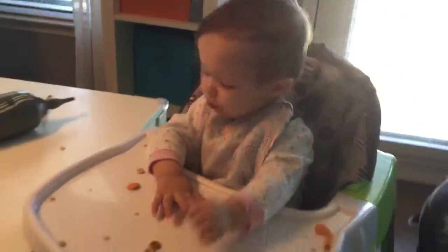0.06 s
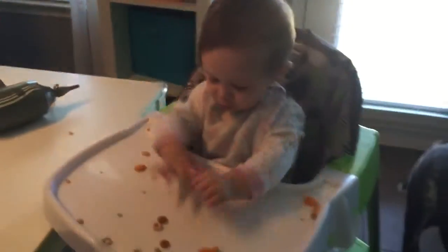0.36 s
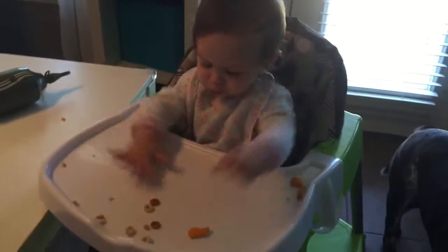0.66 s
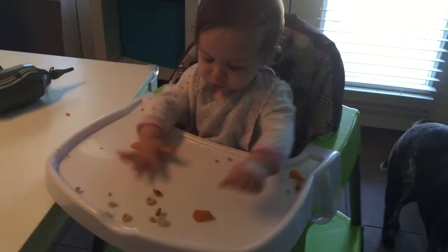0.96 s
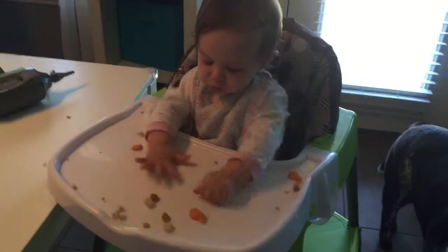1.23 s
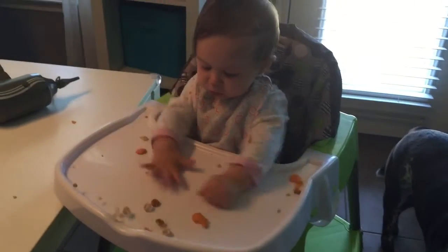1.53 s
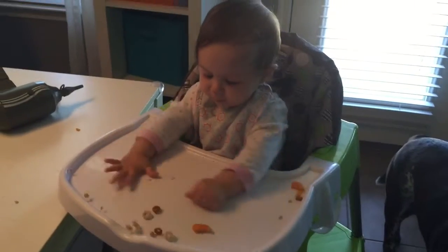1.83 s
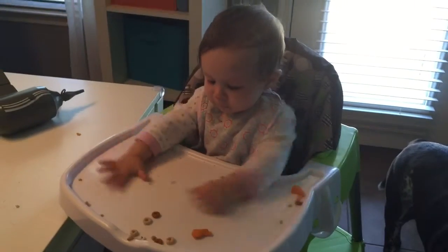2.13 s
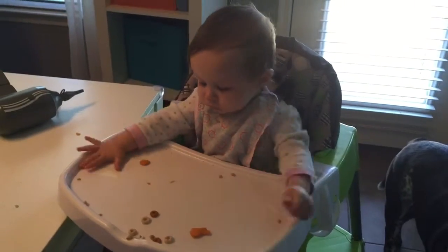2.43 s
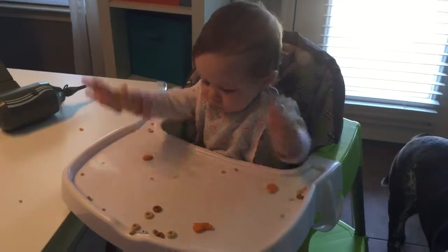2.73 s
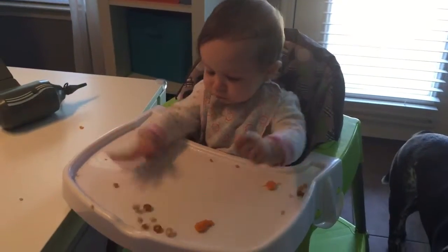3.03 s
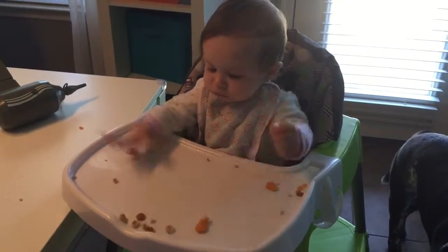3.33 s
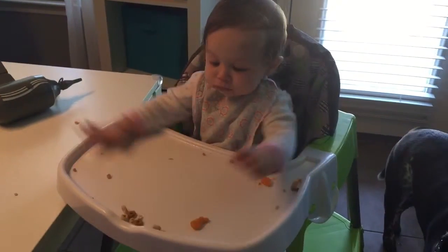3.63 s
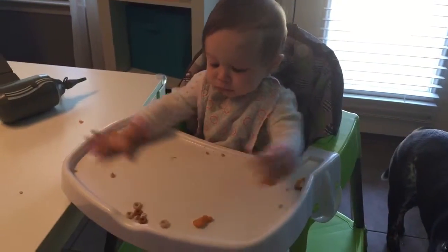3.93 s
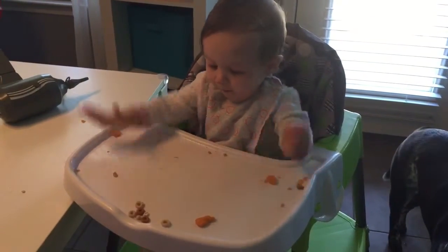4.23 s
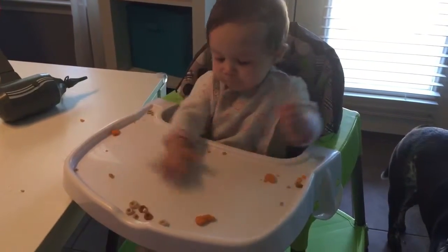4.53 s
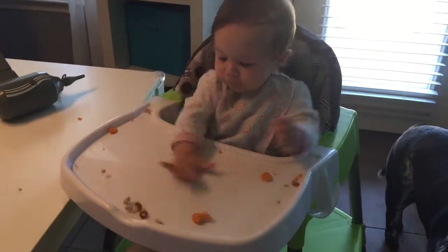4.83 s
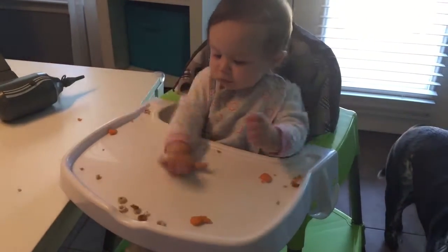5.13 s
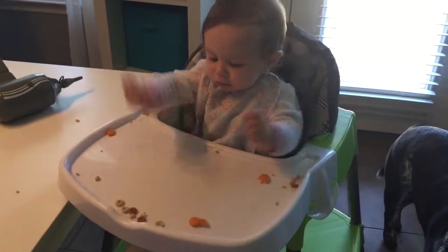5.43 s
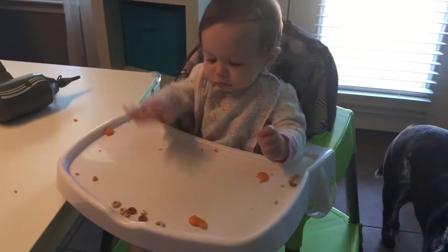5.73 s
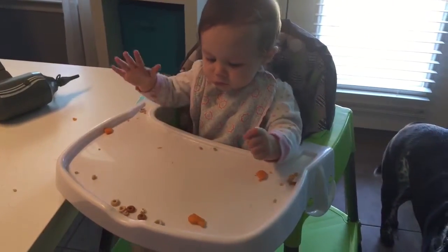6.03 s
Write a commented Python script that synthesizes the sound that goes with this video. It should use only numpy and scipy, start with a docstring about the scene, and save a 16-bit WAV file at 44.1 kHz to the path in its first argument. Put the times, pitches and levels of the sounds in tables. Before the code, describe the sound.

A sleeve brushes softly over plastic, then a baby slaps a high chair tray with both hands, about three times a second and unevenly. Each hit is a hollow knock, many with a sharp smack of skin, some doubled. Bits of cereal hop and the tray rattles lightly between hits, with brief hand slides. It is heard close by in a quiet furnished room with a faint low rumble.

```python
"""A sleeve brushes plastic over faint house rumble; then a baby slaps a hollow high chair tray with
both hands, close by, in a quiet furnished room. Each blow flexes the tray and rings its modes; a flat
palm adds a sharp smack of skin. Bits of cereal hop and land, the tray rattles on its latches, and
hands and sleeves slide over it between the slaps."""
import sys
import numpy as np
from scipy import signal
from scipy.fft import rfft, irfft
from scipy.io import wavfile

SR = 44100
rng = np.random.default_rng(int(sys.argv[2]) if len(sys.argv) > 2 else 0)


def wav_record(signal):
    """Record a signal, one row per channel, as 16-bit PCM in the file named by sys.argv[1]."""
    frames = np.transpose(np.atleast_2d(signal))
    bounded = np.clip(frames, -1, 1)
    # unit amplitude maps onto the largest positive 16-bit level
    quanta = np.round(bounded * 32767).astype(np.int16)
    wavfile.write(sys.argv[1], SR, quanta)


N = 267362
RING_TIME_S = np.arange(SR // 5) / SR
FIRM_DB = -36.5  # force of an ordinary slap; levels in the tables are relative

# House rumble and hiss: (frequency [Hz], spectral density [dB])
HOUSE_SPECTRUM = [(20, -23), (45, -19), (62, 7.5), (80, -3.5), (125, 4.5), (180, -7), (300, -16),
                  (500, -27.5), (1200, -27), (8000, -38.5), (15000, -43)]
# Hand or sleeve strokes: (time [s], length [s], level [dB], swell [0 starts at once, 2 peaks midway])
BRUSH_STROKES = [(0.097, 0.17, -74.5, 0.53), (0.378, 0.04, -58.5, 0.25), (2.198, 0.034, -58.5, 0.56),
                 (2.412, 0.042, -52, 0.24), (2.867, 0.14, -62, 0.24), (3.919, 0.17, -59.5, 0.28),
                 (4.365, 0.014, -49, .1), (4.463, 0.038, -44.5, 1.2), (4.71, 0.027, -61, .2),
                 (5.782, 0.04, -58.5, .3)]
# Sliding cloth: (frequency [Hz], gain [dB])
CLOTH_SPECTRUM = [(400, 0.5), (2000, -9.5), (4500, -0.5), (7000, 4.5), (10000, 6.5), (15500, -7)]
# Damp fingertip drags: (time [s], length [s], level [dB], band centre [Hz])
FINGER_DRAGS = [(0.375, 0.027, -46.5, 1520), (2.246, 0.027, -41, 1750), (2.558, 0.18, -63.5, 1820),
                (2.709, .03, -53, 1610), (3.239, .022, -38, 2330), (4.143, 0.022, -52, 890),
                (5.453, .025, -61.5, 880)]
# Hand strikes: (time [s], force [dB], arm weight [dB], skin smack [dB], depth [dB], hollow resonance [Hz])
SLAPS = [(0.388, -45, -39, -57, 4.5, 950), (0.652, -31.5, -35.5, -50, -3, 595),
         (0.6802, -31, -24.5, -25.5, -7.5, 580), (0.932, -27, -28, -46, 3, 1680),
         (0.9621, -36.5, -56, -27, 6, 510), (1.2031, -28, -28.5, -49, 0.5, 910),
         (1.2693, -31.5, -25, -24, -2.5, 635), (1.5422, -28.5, -37, -64, -3, 1350),
         (1.561, -43, -31, -38, 2.5, 1400), (1.873, -32.5, -43, -49, -2.5, 1304),
         (1.8893, -37, -31, -35.5, 4.5, 1460), (2.252, -41, -37.5, -58, 0, 930),
         (2.2606, -46.5, -72, -56.5, -4.5, 1390), (2.948, -36, -40, -37.5, -5.5, 1360),
         (2.958, -27, -19, -22, 0.5, 1250), (3.2516, -32.5, -37.5, -35.5, -5, 990),
         (3.275, -35, -28.5, -33.5, 0, 920), (3.5354, -31, -29, -46, 3, 740),
         (3.5691, -29.5, -23, -28, -3.5, 526), (3.875, -41, -31.5, -58, 2.5, 820),
         (4.491, -29, -18.5, -28, 1.5, 720), (4.8688, -31, -18, -24.5, 1.5, 1310),
         (5.2299, -34.5, -21.5, -32.5, 2.5, 940), (5.5991, -33, -22, -31, -2.5, 584)]
# Lower edges of the tray's bands: (body [Hz], knock [Hz], clack [Hz])
BAND_EDGES_HZ = [184, 610, 1188]
# Distinct tray modes: (frequency [Hz], level [dB], t60 [s])
TRAY_MODES = [(225, -2.5, 0.15), (257.5, 0, 0.19), (312.6, 4, 0.15), (396.5, -7, 0.22), (490, -9.5, 0.087),
              (590, -6.5, 0.062), (656, -11, 0.062), (896, 5, 0.04), (1025, -4.5, 0.1), (1112, -6, 0.15),
              (1358, 0.5, 0.068), (1755, -10.5, 0.065), (2010, 7.5, 0.018), (2240, 9, 0.014),
              (2430, 15, 0.012)]
# The tray's dense, quickly damped modes: (frequency [Hz], gain [dB])
DENSE_SPECTRUM = [(130, -3), (400, 6), (1000, -0.5), (2000, 4.5), (2600, -1.5), (3400, -5.5), (4600, -15),
                  (8000, -22.5), (15000, -35)]
# Tray on its arms, one hand-damped mode and a beating pair: (frequency [Hz], level [dB], t60 [s])
FLEX_MODES = [(152.5, -4.5, 0.055), (118.1, -12.5, 0.25), (138.6, -7, 0.17)]
# Fingers, then palm, before scaling by hand speed: (lead [s], decay time [s], level [dB])
SKIN_CONTACTS = [(0.0046, 0.0017, -8.5), (0.0023, 0.0012, -0.5)]
# Skin on plastic: (frequency [Hz], gain [dB])
SKIN_SPECTRUM = [(300, 9), (1200, 5.5), (3000, -2), (4700, -7), (6500, -0.5), (9500, -8), (12000, -4.5),
                 (15500, -11.5)]
# Cereal shakes loose, then gathers at the rim: (time [s], landing gain [dB])
CEREAL_LOOSENESS = [(0.6, -27), (1.1, -7), (3.5, 3.5), (4.5, -18), (5.6, -8)]
# Small hard contact: (frequency [Hz], gain [dB])
CLICK_SPECTRUM = [(1000, -3), (3000, 4.5), (4600, -1), (6200, 5.5), (9500, -1), (12000, -1.5), (15500, -5)]
# Crumb, fingertip and latch taps: (time [s], click [dB], tray ring [dB])
LOUD_TAPS = [(0.6164, -45.5, -52.5), (1.026, -40, -44), (1.0309, -38.5, -30.5), (1.0719, -35, -44),
             (1.1141, -47, -39.5), (1.1764, -43, -43), (1.224, -33.5, -46), (1.2885, -37, -47),
             (1.301, -39, -38.5), (1.35, -36, -62), (1.6004, -30.5, -34), (1.6082, -39, -53),
             (1.6639, -37, -41.5), (1.706, -48, -50), (1.8, -47.5, -52.5), (1.8467, -54, -56),
             (1.9024, -34, -30), (1.9263, -36, -36.5), (1.9428, -41, -32.5), (2.0394, -43, -63),
             (2.073, -50, -70), (2.4201, -46, -57), (3.045, -58, -41), (3.0638, -48, -33.5),
             (3.0827, -41, -40.5), (3.1133, -41.5, -38.5), (3.152, -37.5, -42.5), (3.369, -40.5, -51),
             (3.3936, -45, -33), (3.482, -47.5, -40), (3.551, -36, -35), (3.657, -46, -30),
             (3.6807, -49, -37.5), (3.7355, -47, -54), (3.8402, -48.5, -52), (3.9095, -41, -41.5),
             (3.931, -43, -41.5), (4.0015, -42.5, -44.5), (4.083, -51, -57), (4.243, -49, -51),
             (4.3645, -53, -79), (4.548, -49, -42), (4.5673, -45, -60), (4.598, -44.5, -50.5),
             (4.9568, -36, -30.5), (5.2837, -44.5, -37), (5.317, -47.5, -38), (5.367, -45.5, -55.5),
             (5.7205, -45.5, -51.5)]
# Room decay: (frequency [Hz], t60 [s])
ROOM_DECAY = [(100, 0.38), (250, 0.38), (600, 0.53), (1500, 0.53), (4000, 0.5), (12000, 0.67)]
# Room tail: (frequency [Hz], gain [dB])
ROOM_SPECTRUM = [(60, -19.5), (150, -6.5), (300, -4.5), (1000, -8), (2500, -8), (4200, -4.5), (6500, -7.5),
                 (14000, -12)]


def amp(db):
    """Decibels to gain."""
    return 10 ** (np.asarray(db) / 20)


def lookup(points, hz):
    """Table value on a log-frequency axis."""
    table_hz, value = np.transpose(points)
    return np.interp(np.log(hz + 1), np.log(table_hz), value)


def unit_rms(x, span_s):
    """Scales x to rms 1 over its first span_s."""
    return x / np.sqrt(np.mean(x[:int(span_s * SR)] ** 2) + 1e-20)


def add(mix, at_s, sound):
    """Mixes a sound in, in place."""
    part = mix[max(round(at_s * SR), 0):][:len(sound)]
    part += sound[:len(part)]


def colour(x, spectrum, size=4096):
    """Minimum-phase filter; attacks stay sharp."""
    log_gain = np.log(amp(lookup(spectrum, abs(np.fft.fftfreq(size, 1 / SR)))))
    impulse = np.fft.ifft(np.exp(np.conj(signal.hilbert(log_gain)))).real
    return signal.oaconvolve(x, impulse[:size // 2])[:len(x)]


def band(x, hz, kind):
    """Butterworth filter."""
    return signal.sosfilt(signal.butter(3, hz, kind, fs=SR, output="sos"), x)


def house(rms_db=-54.5):
    """Steady low rumble, faint hiss."""
    spectrum = rfft(rng.standard_normal(N)) * amp(lookup(HOUSE_SPECTRUM, np.fft.rfftfreq(N, 1 / SR)))
    return amp(rms_db) * unit_rms(irfft(spectrum, N), N / SR)


def friction(length_s, catch_db=4, catches_per_s=250, swell=0.84):
    """Skin or cloth catches and lets go: uneven noise that swells and fades."""
    progress = np.linspace(0, 1, int(length_s * SR))
    hiss, catches = rng.standard_normal((2, len(progress)))
    grip_db = catch_db * np.interp(progress * length_s * catches_per_s, np.arange(len(progress)), catches)
    return hiss * amp(grip_db) * progress ** swell * (1 - progress) ** 2


def brushes():
    """Hands and sleeves slide over the tray with a light hiss."""
    out = np.zeros(N)
    for at_s, length_s, db, swell in BRUSH_STROKES:
        stroke = colour(friction(length_s, swell=swell), CLOTH_SPECTRUM)
        add(out, at_s, amp(db) * unit_rms(stroke, length_s))
    return out


def rubs(log_half_width=0.53):
    """A damp fingertip sticks and slips, sounding one broad band of the tray."""
    out = np.zeros(N)
    for at_s, length_s, db, hz in FINGER_DRAGS:
        edges_hz = hz * np.exp([-log_half_width, log_half_width])
        slips = band(friction(length_s, catch_db=8.5), edges_hz, "band")
        add(out, at_s, amp(db) * unit_rms(slips, length_s))
    return out


def tray_ring(t=RING_TIME_S, spot_db=4, detune=0.017, fast_t60_s=0.022, slow_t60_s=0.21):
    """One ring of the tray; the hand shifts and weights the modes anew each time."""
    spot, shift = rng.standard_normal((2, len(TRAY_MODES)))
    modes = np.zeros(len(t))
    for k, (hz, db, t60_s) in enumerate(TRAY_MODES):
        envelope = amp(db + spot_db * spot[k] - 60 * t / t60_s)
        modes += (-1) ** k * envelope * np.sin(2 * np.pi * hz * (1 + detune * shift[k]) * t)
    dense_envelope = amp(12 - 60 * t / fast_t60_s) + amp(-2 - 60 * t / slow_t60_s)
    dense_modes = colour(rng.standard_normal(len(t)) * dense_envelope, DENSE_SPECTRUM)
    return modes + 2.57 * dense_modes


def hollow(x, hz, q=6, resonance_db=6):
    """The hollow under the struck spot adds a resonance."""
    return x + amp(resonance_db) * signal.lfilter(*signal.iirpeak(hz, q, fs=SR), x)


def flex(rise_s=0.0035, detune=0.036, lowest_hz=85):
    """The arm's weight pushes the whole tray down; it swings back."""
    t = RING_TIME_S
    tuning = 1 + detune * rng.standard_normal()
    swing = sum(amp(db - 60 * t / t60_s) * np.sin(2 * np.pi * hz * tuning * t)
                for hz, db, t60_s in FLEX_MODES)
    push = 1 - np.exp(-t / rise_s)
    return unit_rms(band(-swing * push, lowest_hz, "high"), span_s=0.017)


def blows(gain_db=-1, flex_db=-1, flex_lag_s=0.0002, finger_lead_s=0.0034, finger_db=-21,
          firm_rise_s=0.00028, knock_db=0.9, firm_clack_db=-2, clack_db_per_db=0.5155):
    """Fingers touch first; the hand then flexes and rings the tray, brighter when harder."""
    out = np.zeros(N)
    body_hz, knock_hz, clack_hz = BAND_EDGES_HZ
    for at_s, force_db, weight_db, _, depth_db, hollow_hz in SLAPS:
        add(out, at_s + flex_lag_s, amp(weight_db + flex_db) * flex())
        rise_s = firm_rise_s * amp(FIRM_DB - force_db)  # a gentle pat settles more slowly
        press = 1 - np.exp(-RING_TIME_S / rise_s)
        clack_db = firm_clack_db + clack_db_per_db * (force_db - FIRM_DB)
        for lead_s, contact_db in ((finger_lead_s, finger_db), (0, 0)):
            ring = tray_ring() * press
            body = band(ring, [body_hz, knock_hz], "band")
            knock = hollow(band(ring, [knock_hz, clack_hz], "band"), hollow_hz)
            clack = band(ring, clack_hz, "high")
            parts = (depth_db, body), (knock_db, knock), (clack_db, clack)
            strike = sum(amp(db) * unit_rms(part, span_s=0.02) for db, part in parts)
            add(out, at_s - lead_s, amp(force_db + contact_db) * strike)
    return amp(gain_db) * out


def smacks(gain_db=5.5, grain=0.52, brisk_db=-27, slowing_db_per_db=0.6):
    """Skin meets plastic in bursts of tiny contacts; a faster hand is louder and shorter."""
    out = np.zeros(N)
    t = RING_TIME_S[:SR // 20]
    for at_s, _, _, smack_db, *_ in SLAPS:
        slowness = min(amp(slowing_db_per_db * (brisk_db - smack_db)), 3)
        for lead_s, decay_s, db in SKIN_CONTACTS:
            hiss, log_size = rng.standard_normal((2, len(t)))
            burst = hiss * np.exp(grain * log_size - t / (slowness * decay_s))
            smack = unit_rms(colour(burst, SKIN_SPECTRUM), span_s=0.002)
            add(out, at_s - lead_s / max(slowness, 1), amp(smack_db + db) * smack)
    return amp(gain_db) * out


def shoves(gain_db=1, hz=85, t60_s=0.079, lowest_hz=55):
    """A fist bumps the whole chair; the flatter the hand, the less."""
    out = np.zeros(N)
    t = RING_TIME_S
    bump = band(np.sin(2 * np.pi * hz * t) * amp(-60 * t / t60_s), lowest_hz, "high")
    for at_s, force_db, _, smack_db, *_ in SLAPS:
        flatness = min(amp(smack_db - force_db), 1)
        add(out, at_s, amp(force_db + gain_db) * (1 - flatness) * bump)
    return out


def tap(click_db, ring_db, click_s=0.0023, damping_s=0.16, lowest_hz=700):
    """Small hard contact: a click and a short ring of the tray's upper modes."""
    t = RING_TIME_S[:SR // 20]
    click = colour(rng.standard_normal(len(t)) * np.exp(-t / click_s), CLICK_SPECTRUM)
    ring = band(tray_ring(t), lowest_hz, "high") * np.exp(-t / damping_s)
    return amp(click_db) * unit_rms(click, span_s=0.0015) + amp(ring_db) * unit_rms(ring, span_s=0.0064)


def cereal(count=5, gain_db=-18, spread_db=0.5, min_flight_s=0.034, settle_s=0.2, settle_db=10,
           mean_hop_s=0.047, bounce_db=-6):
    """Each blow throws crumbs up; each lands and bounces once, late ones softer."""
    out = np.zeros(N)
    for at_s, force_db, *_ in SLAPS:
        thrown_db = force_db + gain_db + np.interp(at_s, *np.transpose(CEREAL_LOOSENESS))
        flights = (np.arange(count) + rng.random(count)) / count
        for lateness, hop, size in zip(flights, rng.random(count), rng.standard_normal(count)):
            landing_s = at_s + min_flight_s + settle_s * lateness
            landing_db = thrown_db + spread_db * min(size, 1) - settle_db * lateness
            bounce_s = landing_s + mean_hop_s * (0.5 + hop)
            for contact_s, db in ((landing_s, landing_db), (bounce_s, landing_db + bounce_db)):
                add(out, contact_s, tap(db, db, click_s=0.0003))
    return out


def ticks(ring_gain_db=-1):
    """The loudest taps of crumbs, fingertips and latches on the plastic."""
    out = np.zeros(N)
    for at_s, click_db, ring_db in LOUD_TAPS:
        add(out, at_s, tap(click_db, ring_db + ring_gain_db))
    return out


def with_echoes(x, ceiling_s=0.016, ceiling_db=-10, table_s=0.0048, table_db=-17):
    """Direct sound plus first reflections off ceiling and table."""
    out = x.copy()
    add(out, ceiling_s, amp(ceiling_db) * band(x, 640, "high"))
    add(out, table_s, amp(table_db) * x)
    return out


def room(x, build_s=0.0065):
    """Diffuse tail: builds quickly, each band decays at its own rate."""
    size = SR * 3 // 4
    hz, t, noise = signal.stft(rng.standard_normal(size), SR, nperseg=256)
    t60_s = lookup(ROOM_DECAY, hz)[:, None]
    unit_energy = np.sqrt(2 * np.log(1000) / (t60_s * SR))
    gain = amp(lookup(ROOM_SPECTRUM, hz)[:, None] - 60 * t / t60_s) * unit_energy
    tail = signal.istft(noise * gain, SR, nperseg=256)[1][:size]
    build = 1 - np.exp(-(np.arange(size) / SR / build_s) ** 2)
    return signal.oaconvolve(x, tail * build)[:N]


def scene(directions=3, small_send_db=1.5):
    """Slaps radiate a different wave each way: one arrives directly, all feed the room. Mono."""
    small_sounds = ticks() + cereal() + brushes() + rubs()
    slap_waves = [blows() + smacks() for _ in range(directions)]
    diffuse = sum(room(wave + amp(small_send_db) * small_sounds) for wave in slap_waves)
    near = with_echoes(slap_waves[0] + small_sounds) + shoves()
    return (near + diffuse / np.sqrt(directions) + house())[None]


def record(dry, cutoff_hz=15750):
    """Steep low-pass on the mix."""
    lowpass = signal.firwin(255, cutoff_hz, window=("kaiser", 8), fs=SR)
    return signal.oaconvolve(dry, lowpass[None], "same")


dry = scene()
out = record(dry)
wav_record(out)
```